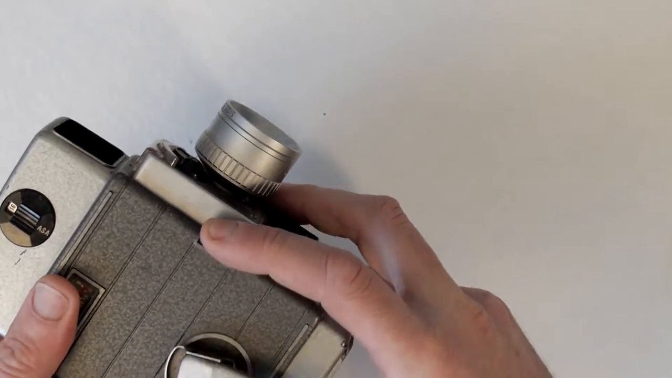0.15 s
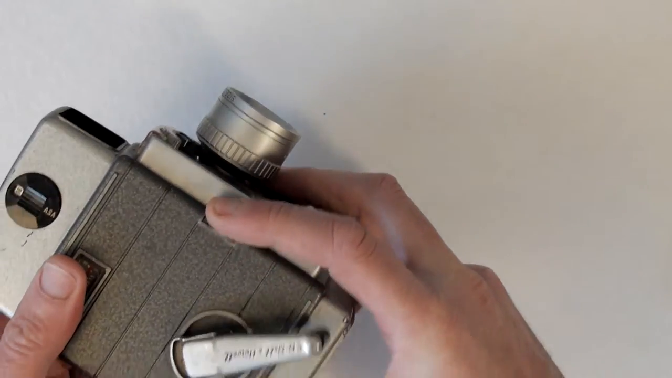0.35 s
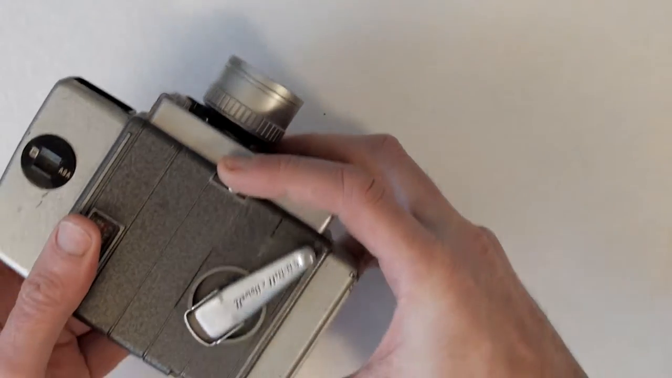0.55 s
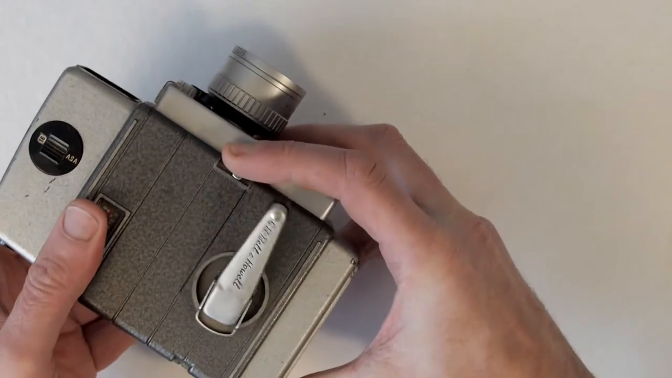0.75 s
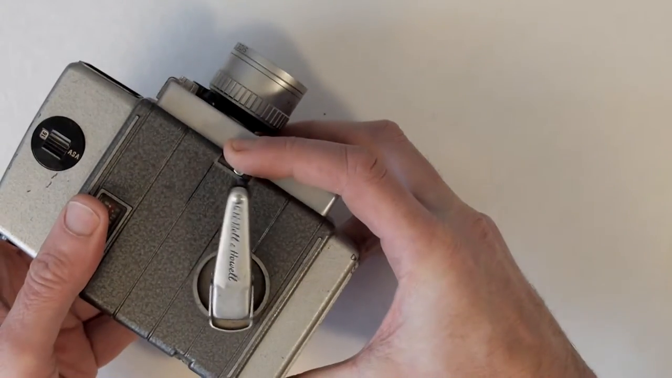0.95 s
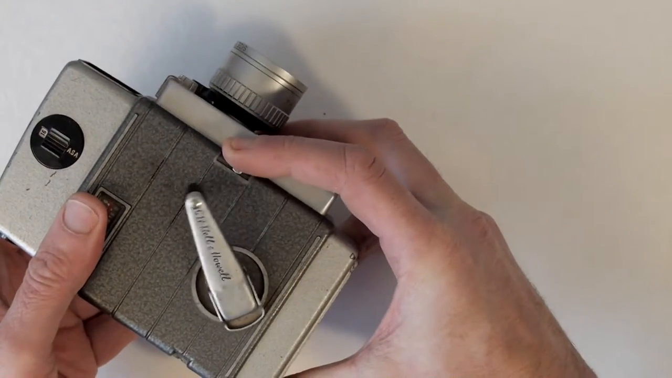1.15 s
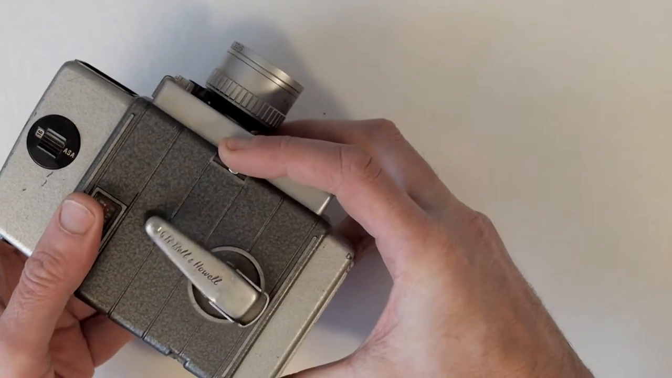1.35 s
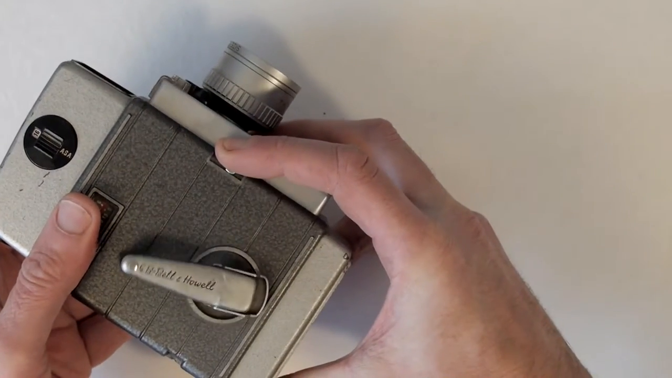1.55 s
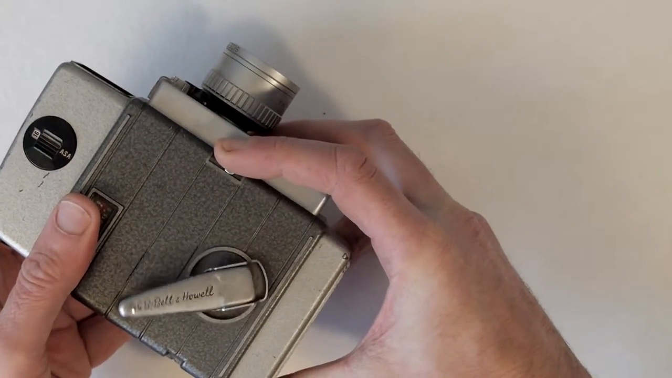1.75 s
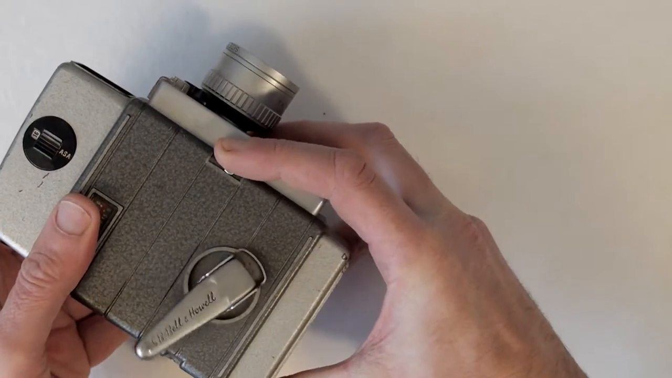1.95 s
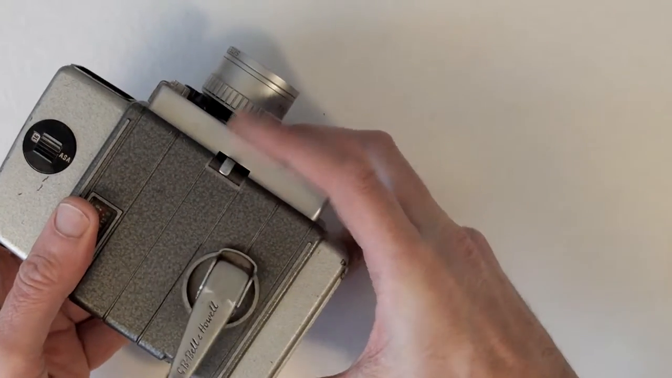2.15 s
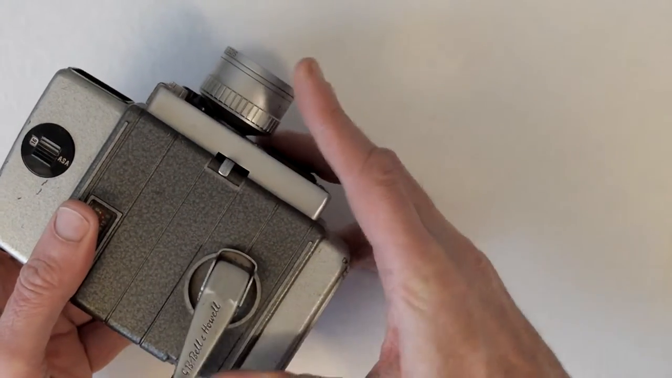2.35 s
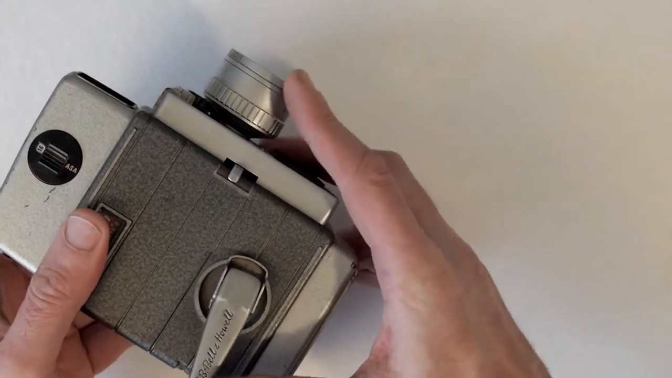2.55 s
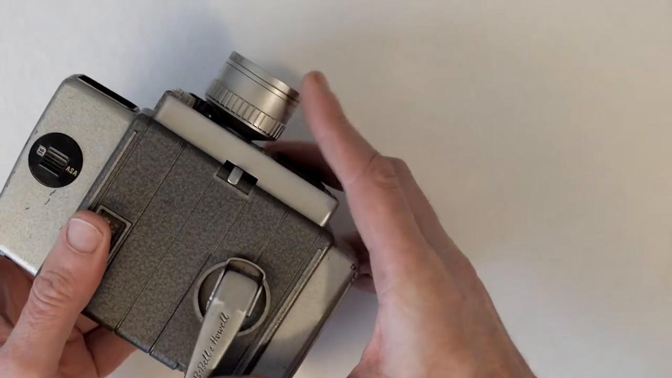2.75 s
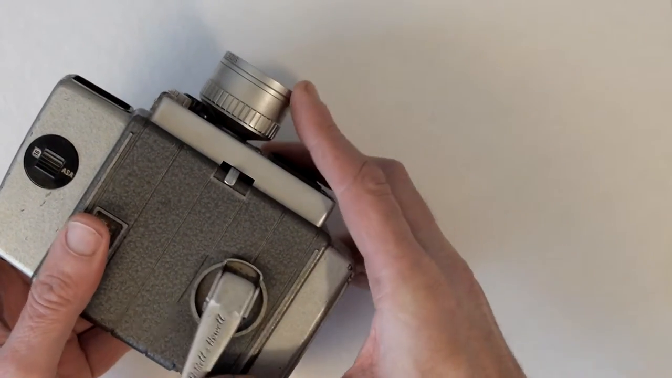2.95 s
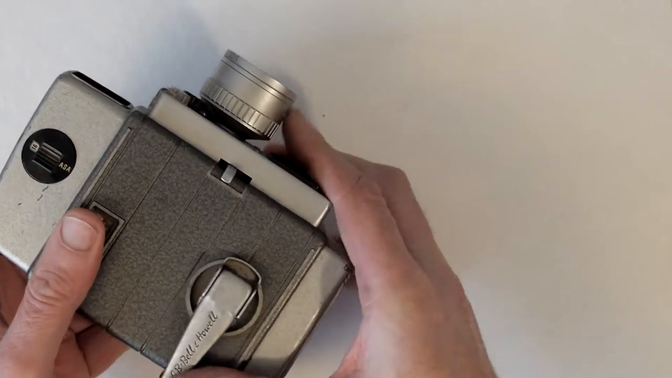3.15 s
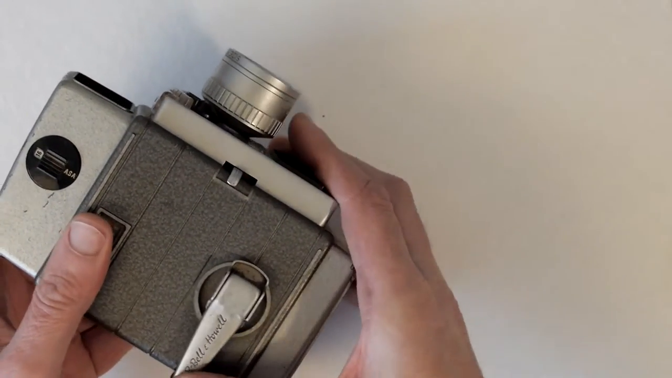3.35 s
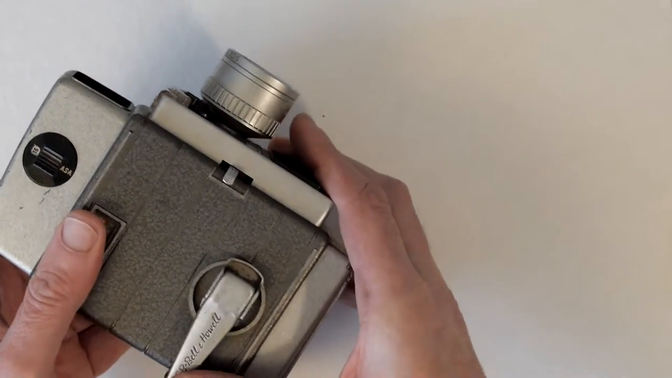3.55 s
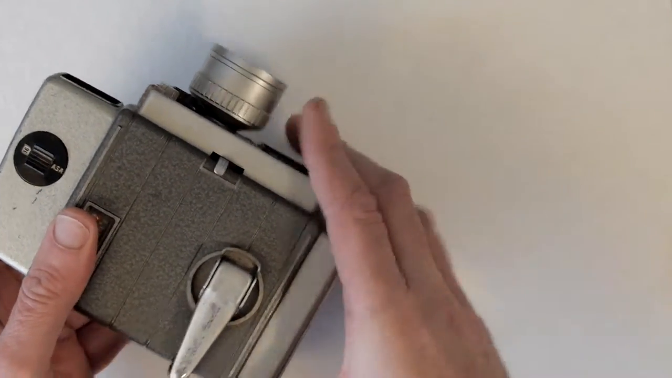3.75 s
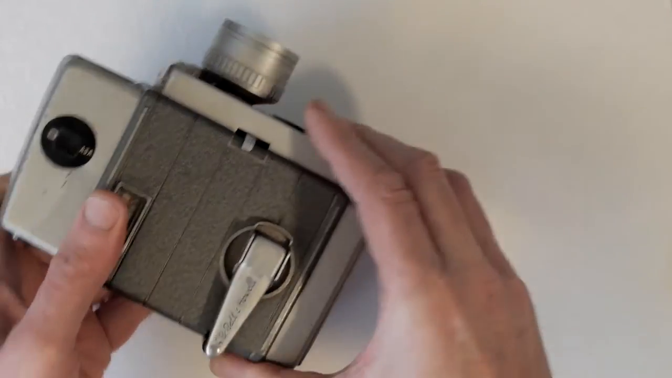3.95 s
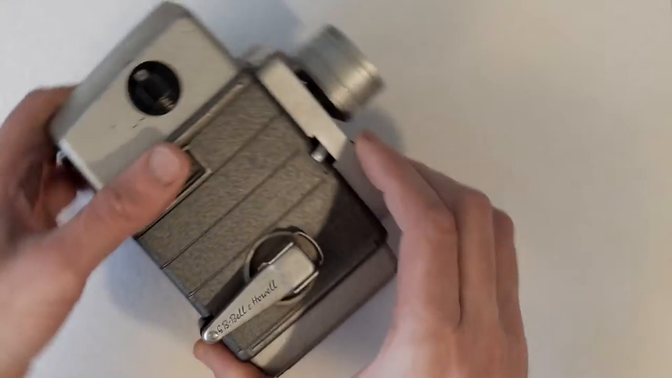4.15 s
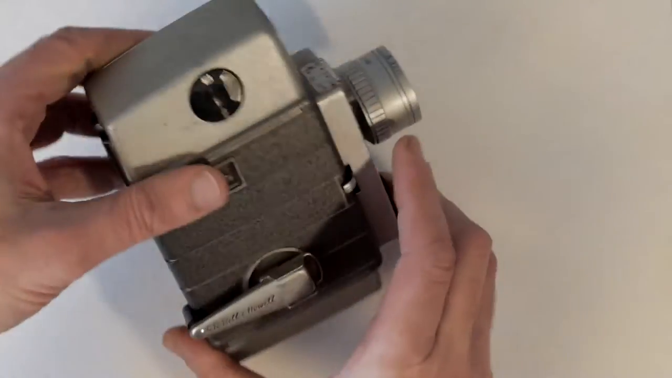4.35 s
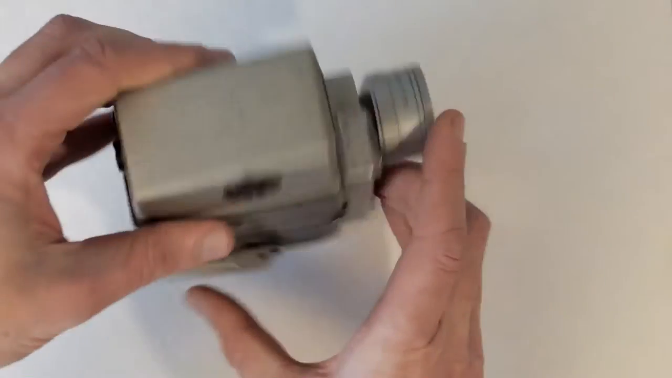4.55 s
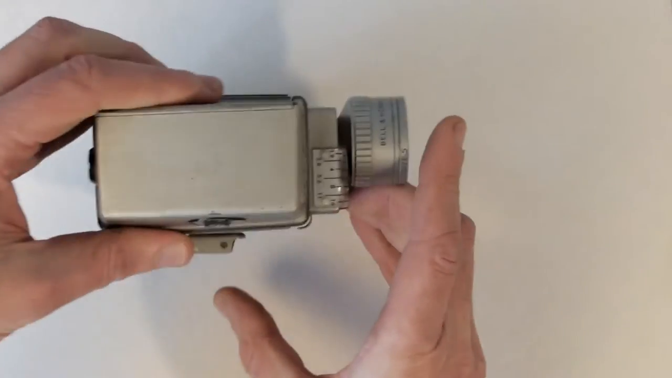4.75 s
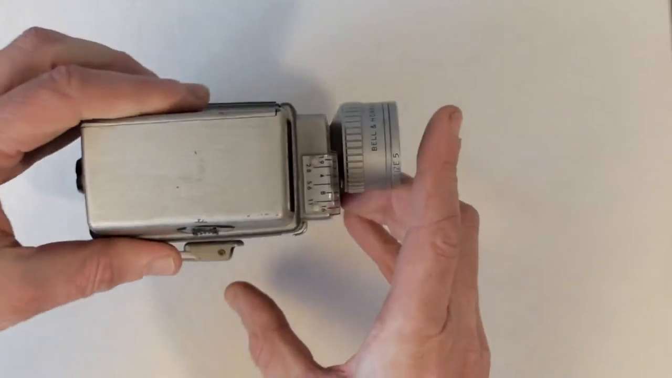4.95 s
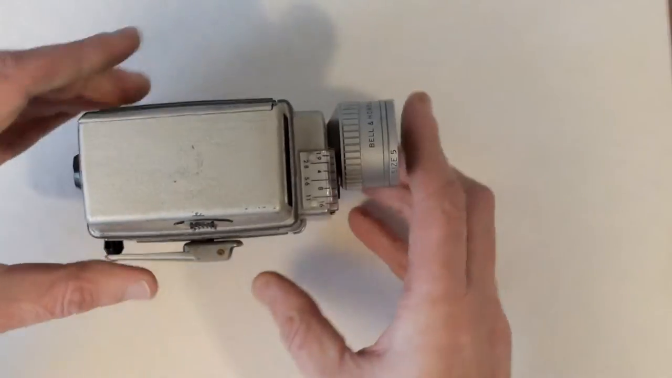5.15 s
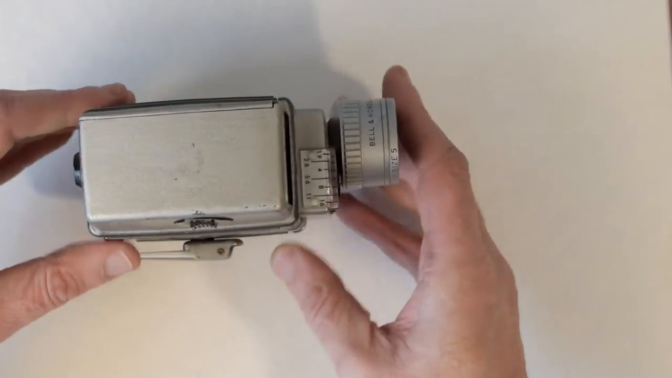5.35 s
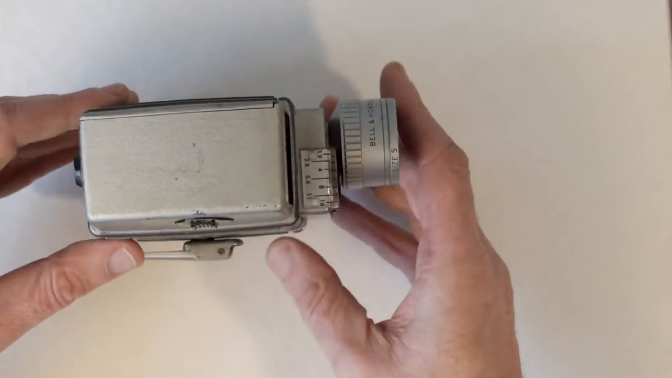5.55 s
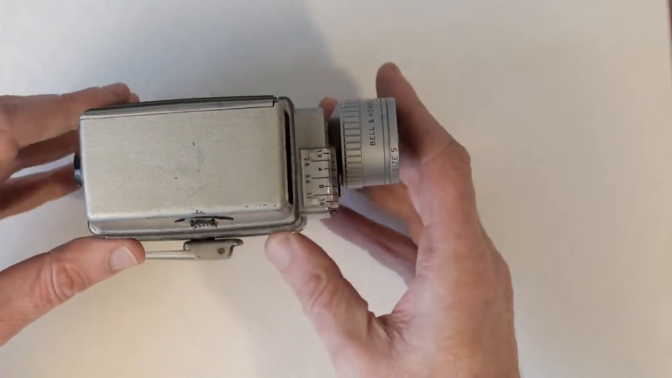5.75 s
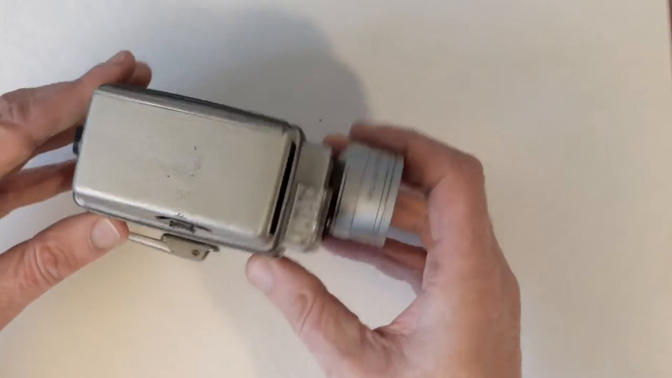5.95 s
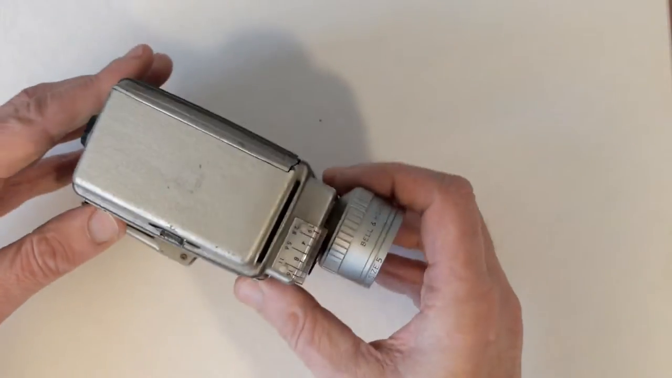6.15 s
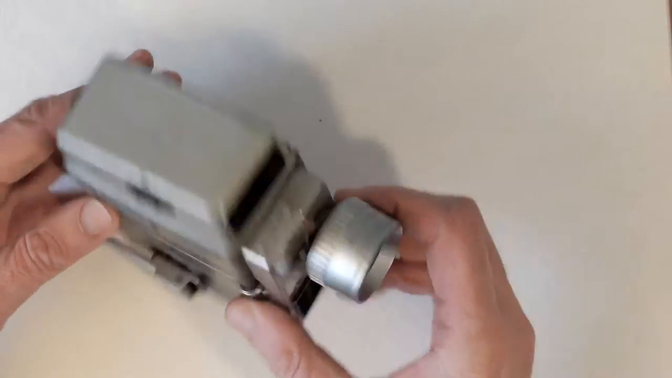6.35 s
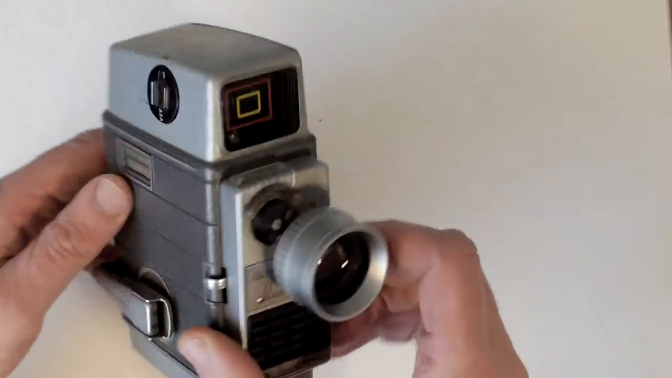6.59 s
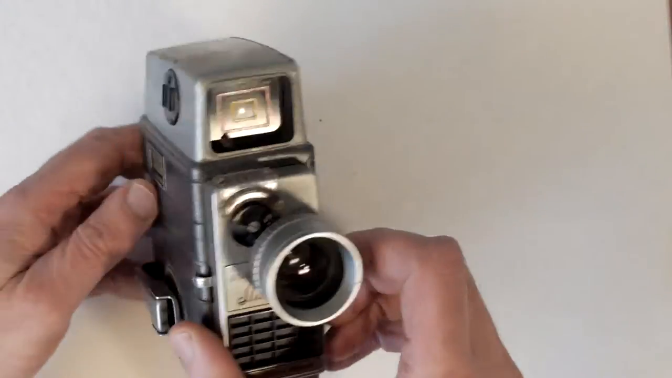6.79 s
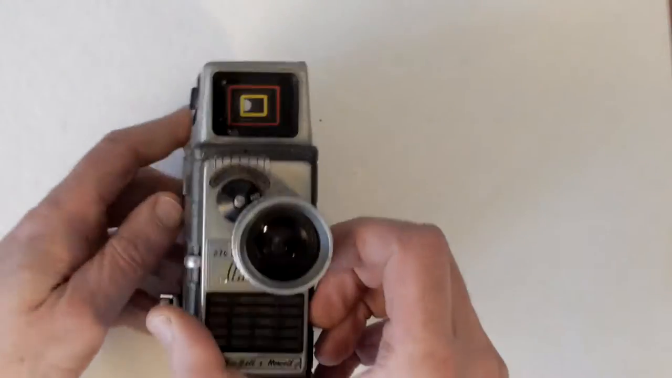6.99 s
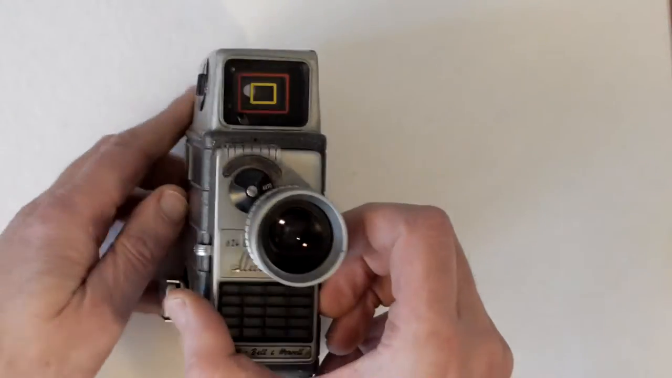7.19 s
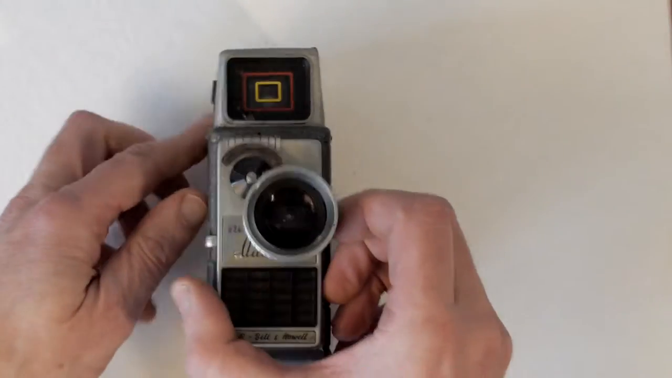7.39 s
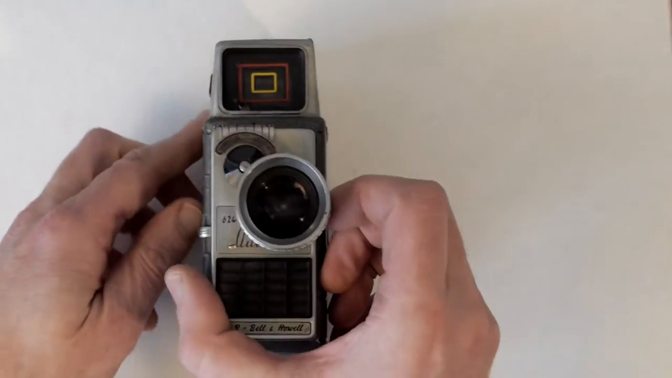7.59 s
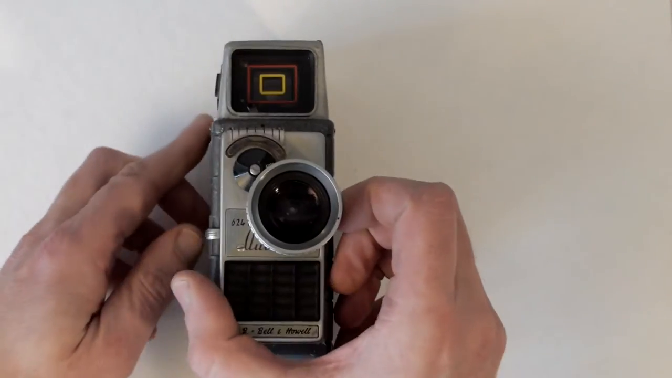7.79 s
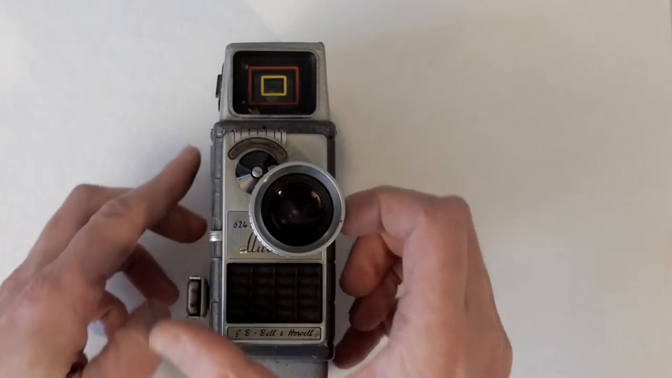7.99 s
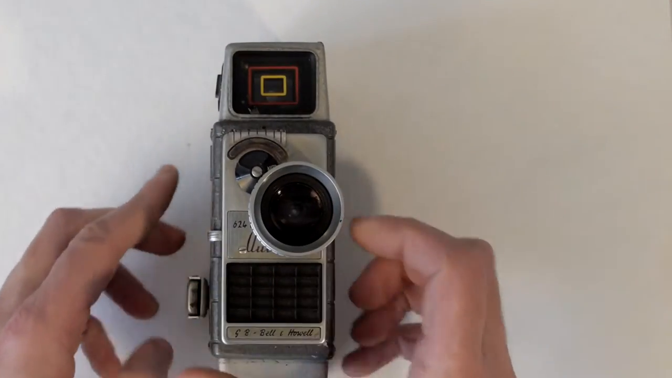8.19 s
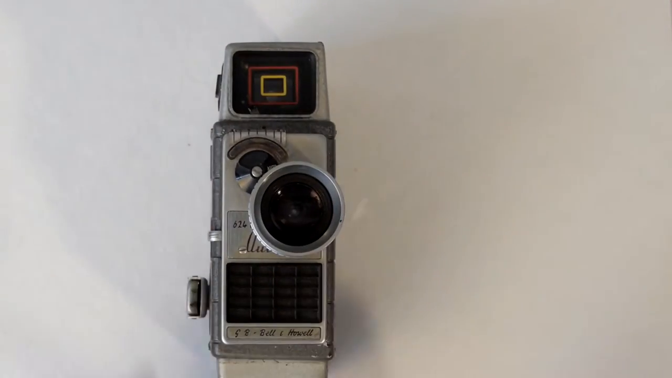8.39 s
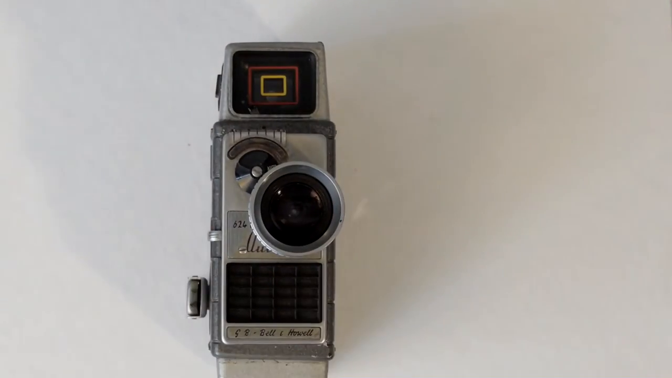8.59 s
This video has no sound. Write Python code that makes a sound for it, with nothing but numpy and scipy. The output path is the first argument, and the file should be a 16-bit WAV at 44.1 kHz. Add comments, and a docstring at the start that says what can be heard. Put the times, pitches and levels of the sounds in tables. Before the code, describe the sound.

Close up in a small quiet room, a spring-wound movie camera runs with a bright, gritty mechanical whirr, ticking about fifteen times a second. After two seconds its button snaps back and the motor stops dead. Hands then slide over metal and table with faint scuffs, scattered clicks and hollow bumps, building to firmer knocks and a hard click as the camera is set down near the end.

```python
"""A clockwork movie camera whirrs and rattles at about 15 frames a second, then its button snaps back and stops it.
After that come clicks, scuffs, sliding hands, knocks and a faint squeak, close by in a small room with faint room tone.
Gears and claw are noise shaped by trains of blows, some of it ringing the case; clicks are short bursts of metallic noise.
Knocks add fading tones of camera and table; rubbing is grainy noise; the room is an echo of fading noise."""
import sys
import numpy as np
from scipy import signal
from scipy.fft import rfft, irfft, next_fast_len
from scipy.io import wavfile
from scipy.ndimage import map_coordinates

SR = 44100
rng = np.random.default_rng(int(sys.argv[2]) if len(sys.argv) > 2 else 0)


def unload_audio(sound):
    """Save the sound as a 16-bit wav file, at the path given as the first command line argument."""
    columns = np.transpose(np.atleast_2d(sound))
    # keep every value between -1 and 1, then stretch to whole-number steps
    steps = np.round(np.clip(columns, -1, 1) * 32767)
    wavfile.write(sys.argv[1], SR, steps.astype(np.int16))


N = 380528
TIME = np.arange(N) / SR  # seconds from the start
AFTER = np.arange(SR // 2) / SR  # seconds after one touch

# In all tables fade_s is the time to fall by 60 dB; levels are relative, before the mix.
# Speed of the spring motor: time_s, speed_frames_per_s
MOTOR_SPEED = [(0, 14.6), (.4, 15.1), (.65, 15), (.9, 15.5), (1.3, 15.2), (1.75, 15.15), (2, 15.9),
               (2.27, 15.9)]
# Loudness of the motor: time_s, level_db
MOTOR_LEVEL = [(0, -29), (.35, -28), (.8, -27.5), (1.2, -28.5), (1.5, -27.5), (2.27, -28)]
STOP_S = 2.268
# Blows of claw and shutter in one frame: place_share_of_turn, force_db
CLAW_BLOWS = [(.76, -4), (0.86, -1), (0.94, 1.5), (0.028, -8), (0.39, 0)]
# Resonances of the case around the motor: pitch_hz, width_hz, level_db
CASE_MODES = [(355, 39, -18.5), (905, 100, -19), (1308, 54, -12.5), (1622, 41, -9), (2013, 130, -7),
              (2181, 80, 2.5), (2346, 98, -10), (3250, 50, -12), (3710, 87, -8.5), (5690, 280, -8.5)]
# One side panel sinks in pitch as the grip settles: time_s, pitch_hz
PANEL_PITCH = [(.35, 3570), (.85, 3480), (1.6, 3425)]
PANEL_WIDTH_HZ, PANEL_DB = 115, -3
# The ringing side of the case turns toward the microphone: time_s, level_db
CASE_FACING = [(0, -4), (.7, -1.5), (1.5, 1), (2.27, -0.5)]
# Colour of the gear noise: pitch_hz, level_db
GEAR_COLOUR = [(100, -42), (260, -16), (340, -5.5), (800, -0.5), (1800, -0.5), (2600, -3), (4500, 0.5),
               (8000, 2), (9300, 0), (10200, -3), (12200, -10), (13000, -9), (14000, -14), (16000, -20.5)]
# Four metallic bands drift as the camera turns in the hand:
# time_s, pitch_hz, pitch_hz, pitch_hz, pitch_hz, level_db (against the motor)
SHEEN_DRIFT = [(0, 7730, 7750, 9200, 11200, -11), (.3, 7620, 7780, 9100, 11250, -15),
               (.6, 7250, 7900, 8990, 11050, -12), (.95, 7180, 8000, 9130, 10930, -15.5),
               (1.35, 7080, 8300, 9230, 10850, -15), (2.27, 7500, 8450, 9560, 10820, -15)]
# The same four bands: width_hz, level_db
SHEEN_WIDTHS = [(450, -2), (450, -2), (480, -1.5), (600, -9)]
SHEEN_FLUTTER_DB = 2.5  # each band flutters on its own
# Spring modes that shiver on after the stop: pitch_hz, width_hz, level_db, fade_s
SPRING_SHIVER = [(620, 60, -55, .7), (2180, 120, -54, .25), (3670, 220, -53, .35), (5740, 250, -53, .33),
                 (7240, 250, -51, .38)]

# Coils of the unwinding spring slip while the motor runs: time_s, level_db
SPRING_SLIPS = [(0.059, -15), (0.866, -15), (1.255, -16), (1.391, -15), (1.457, -16), (1.978, -17),
                (2.173, -12)]
# The button unlatches, then springs home: time_s, snap_db, strongest_ring_hz, fade_s, spring_db
BUTTON_SNAPS = [(2.2255, -9.5, 12000, .014, -27.5), (2.266, -4, 8200, 0.034, -16.5)]
# Ringing tones of the button: pitch_hz, level_db, fade_s
BUTTON_MODES = [(3720, -7, .02), (5700, -5, .015), (7300, -5, .02), (8550, -7, .012), (9270, 0, .022),
                (10350, -5, .015)]
# Fingers and table snap the key and fittings: time_s, level_db, strongest_ring_hz, fade_s
FITTING_CLICKS = [(2.5766, -43, 2820, .025), (2.6522, -37.5, 5130, 0.022), (2.8892, -11.5, 6290, 0.0099),
                  (3.108, -38, 7050, 0.033), (3.175, -33.5, 7340, 0.0096), (3.196, -34, 4000, 0.022),
                  (4.061, -42, 7000, 0.018), (4.899, -36.5, 4900, 0.016), (5.1621, -27.5, 7170, 0.008),
                  (5.516, -40.5, 4450, 0.028), (5.9201, -17, 7080, 0.009), (6.38, -30, 6430, 0.014),
                  (7.0103, -22.5, 4950, 0.02), (7.0215, -28.5, 6000, 0.016), (7.466, -2, 3990, 0.013),
                  (7.476, -22, 3180, 0.015), (7.5958, -35.5, 3510, .02)]
# The winding key taps the case: time_s, ring_db, snap_db, rise_s
KEY_ON_CASE = [(4.7313, -44.5, -23, 0.00026), (5.0912, -41, -25.5, 0.0012), (5.3742, -49.5, -30, 0.0025),
               (7.4665, -29, -25, .001), (7.555, -41, -39, .002)]
# Ringing tones of the key: pitch_hz, level_db, fade_s
KEY_MODES = [(2190, -2.5, .03), (2460, -3.5, 0.02), (2790, 4.5, .02), (3120, -4.5, 0.028), (4190, -8, 0.02),
             (4400, -13, .022), (5970, -10.5, .013)]
# Fingernails and fittings tick on the hollow case: time_s, level_db
NAIL_TICKS = [(2.8895, -39.5), (3.064, -61.5), (3.1965, -53.5), (3.342, -62.5), (4.634, -50.5),
              (4.64, -48.5)]
# Colour of a metal snap: pitch_hz, level_db (per Hz)
METAL_COLOUR = [(200, -27), (1000, 0), (2200, 6), (2700, -2.5), (3700, -2.5), (5500, -0.5), (7500, -1.5),
                (9300, -1.5), (11000, 0), (16000, -7)]
CLICK_BODY_DB = -25.5  # the body's answer, against the snap

# Knocks on the camera: time_s, body_db, strongest_ring_hz, spread_octaves, table_db
CAMERA_KNOCKS = [(2.578, -52, 990, 0.62, -73), (2.8899, -39.5, 753, 1.2, -58),
                 (3.151, -55.5, 700, 0.74, -83), (3.275, -60, 700, 1, -83), (3.305, -63, 1050, .5, -83),
                 (4.057, -59, 420, 0.54, -75), (4.123, -58, 1100, 1.5, -78), (4.16, -57.5, 800, 1.4, -72),
                 (4.183, -56.5, 550, 0.94, -74), (4.198, -48, 650, 1.6, -70),
                 (4.223, -49, 337, 0.41, -50.5), (4.246, -50, 750, 1, -58), (4.748, -40, 520, 1.2, -33.5),
                 (4.757, -57, 430, 1.2, -39), (4.782, -62, 350, 0.79, -38), (4.806, -62, 338, .8, -42),
                 (4.85, -66, 338, .8, -48), (4.971, -76, 340, .8, -54), (5.012, -62, 846, .6, -70),
                 (5.0894, -48.5, 283, 0.41, -51), (5.1973, -52.5, 1100, 1, -54), (5.258, -57, 800, 1, -58),
                 (5.373, -50, 990, 1, -57), (5.921, -52, 900, 1.5, -70), (6.345, -37, 560, 0.93, -62.5),
                 (6.802, -40, 500, 1.3, -49), (6.977, -49, 1400, 0.3, -71), (7.0094, -23.5, 1000, 1.4, -55),
                 (7.021, -30, 400, .5, -51), (7.122, -42.5, 750, .9, -69), (7.1316, -29, 690, .4, -70),
                 (7.268, -38, 750, 1, -47.5), (7.316, -44.5, 1096, 0.88, -49),
                 (7.377, -51.5, 1094, .9, -54.5), (7.4614, -36, 400, 1.2, -28.5),
                 (7.4662, -26.5, 520, 1.6, -39), (7.4953, -37.5, 479, .9, -37),
                 (7.5551, -37, 850, .2, -43.5), (7.596, -50.5, 700, 0.35, -52)]
# Tones of the camera body when it rings freely: pitch_hz, level_db, fade_s
BODY_MODES = [(331.6, -3, 0.08), (420, -1.5, 0.075), (500, -2.5, 0.04), (606, -5, 0.19), (690, 0, 0.042),
              (845, -7, 0.055), (1018, 1.5, 0.034), (1130, 0, .015), (1340, -1, 0.04), (1751, -6.5, 0.115),
              (1900, -11, .06), (2310, -7.5, 0.06), (2800, -12, .04), (3275, -9, .11)]
# Tones of the table top when it rings freely: pitch_hz, level_db, fade_s
TABLE_MODES = [(38, -16, 0.25), (62.3, -11, 0.15), (82, -6, 0.15), (123, -4, 0.1), (166, 1, 0.18),
               (205, 1.5, 0.14), (238, -3.5, 0.2), (265, -3.5, 0.3), (344, -4, 0.2), (436, -8, .2),
               (571, -15, .2)]
FREE_DB, GRIP_DB = -18.5, 32  # a knock this hard rings freely; every GRIP_DB less halves the ring time
TOUCH_S, TOUCH_DB = 0.0089, -8  # the case grazes for a moment before each knock lands
CHATTER_DB, TABLE_SCATTER_DB = -11, 2
LIGHT_DB = 10.5  # a light touch loses up to this much of the table's deep boom

# Short slips of fingers and case: start_s, length_s, level_db, centre_hz
SHORT_SCUFFS = [(2.441, 0.029, -46, 5250), (2.783, 0.0265, -46.5, 4630), (2.951, 0.041, -53.5, 4416),
                (3.146, 0.034, -51, 5490), (3.253, 0.035, -57.5, 4160), (3.355, 0.022, -49, 5400),
                (3.762, 0.033, -42, 4300), (3.786, 0.032, -36, 4400), (4.629, .024, -35.5, 13900),
                (4.731, 0.037, -47.5, 3500), (7.003, 0.029, -41.5, 5396), (7.159, 0.05, -43.5, 6080),
                (7.253, 0.046, -38, 6560), (7.305, 0.052, -42.5, 6450), (7.389, 0.11, -45.5, 6090),
                (7.447, 0.034, -35.5, 2990)]
# Colour of the scuffs: pitch_hz, level_db (per Hz)
SCUFF_COLOUR = [(200, -25), (650, -6), (1200, -15.5), (2100, 0.5), (2500, -1), (3400, -1), (4300, -8),
                (5600, -5), (9000, -6.5), (13000, -4.5), (16000, -9.5)]
SCUFF_ATTACK_S, SCUFF_RELEASE_S, SCUFF_ARCH_DB = 0.0062, 0.012, 3.5
# A fingertip drags on metal: time_s, pitch_hz, level_db
FINGER_SQUEAK = [(6.79, 7000, -76.5), (6.81, 7006, -64), (6.86, 6144, -85.5), (6.96, 6020, -72),
                 (7, 5820, -89.5)]

# Strokes of the hands over table and case: start_s, length_s, hiss_db, body_db
HAND_STROKES = [(3.03, 0.5, -65, -69.5), (3.655, 0.41, -58.5, -61), (4.005, 0.24, -60, -61),
                (4.165, 0.3, -46, -56), (4.398, 0.34, -48, -55.5), (4.743, 0.24, -52, -57),
                (4.906, 0.29, -63, -66), (5.077, 0.44, -51.5, -60.5), (5.429, 0.19, -65, -73),
                (5.859, 0.39, -49, -56.5), (6.241, 0.35, -53.5, -59.5), (6.499, 0.54, -60.5, -59.5),
                (7.222, 0.37, -50, -47.5), (7.518, 0.37, -61, -57.5)]
STROKE_ATTACK_S, STROKE_RELEASE_S, STROKE_ARCH_DB = 0.018, 0.14, 6.5  # loudest in mid stroke
HOLD_HISS_DB, HOLD_BODY_DB = -75.5, -67.5  # the hands never rest completely
BUMPS_PER_S, BUMP_DB = 11, -11  # average rate of small bumps; level against the stroke's body
# Colour of the skin hiss: pitch_hz, level_db (per Hz)
SKIN_COLOUR = [(600, -33), (1000, -10), (1700, -5.5), (2150, 0.5), (2450, -2.5), (2850, -1), (3200, -3),
               (3550, -2), (4300, -3), (6500, -5), (9000, -7), (13000, -13.5), (16000, -22)]
# Colour of the hollow sound under the hands: pitch_hz, level_db (per Hz)
HOLLOW_COLOUR = [(88, -41), (150, -14), (242, -7.5), (345, 1), (530, -8), (720, -2.5), (900, -9),
                 (1520, -9), (1800, -11.5), (2340, -34.5), (3960, -120)]
# Bands of the case that rubbing makes sing: pitch_hz, width_hz, level_db (against the hiss)
SINGING_BANDS = [(1500, 250, -19), (2050, 200, -20), (2850, 220, -11), (3540, 190, -12)]
RUB_GRAIN_DB, RUB_SWELL_DB = 2.8, 1.3  # quick fits of singing; slower swells of finger pressure

# How fast the echo dies: pitch_hz, fade_s
ROOM_FADE = [(150, 0.57), (600, 0.33), (3000, 0.3), (8000, 0.21), (15000, 0.24)]
# Colour of the echo: pitch_hz, level_db
WALL_COLOUR = [(60, -3.5), (250, 6), (600, 3.5), (1200, 1.5), (4000, -0.5), (8000, -8), (16000, -8)]
# Colour of the room tone: pitch_hz, level_db (per Hz)
QUIET_COLOUR = [(15, -38.5), (25, -7.5), (166, -4), (249, -4.5), (270, -19), (317, -8), (363, -19),
                (575, -11), (734, -8.5), (840, -8.5), (2000, -21), (2410, -21), (16000, -28)]
END_S, TOP_HZ = 7.745, 15900


def motor(teeth_per_frame=44):
    """Gear teeth rattle, harder while the claw pulls; both ring the case until the stop."""
    turns = np.cumsum(curves(MOTOR_SPEED)[0]) / SR - .23
    frames = np.arange(-1, int(turns[-1]) + 1)
    teeth = np.arange(len(frames) * teeth_per_frame) / teeth_per_frame
    load_db = 2.8 * np.cos(2 * np.pi * teeth)

    place, force_db = np.transpose(CLAW_BLOWS)
    claw_places = (frames[:, None] + place).ravel()
    claw_db = np.tile(force_db, len(frames))
    claw = unit(blows(turns, claw_places, claw_db, jitter_s=.001, scatter_db=1.84, t60=0.045))

    def wheel(step, jitter_s, scatter_db, t60):
        """One gear wheel: a blow for every step-th tooth."""
        return unit(blows(turns, teeth[::step], load_db[::step], jitter_s, scatter_db, t60))

    # the wheels chatter independently: in the open they buzz, against the case they tick
    fine = wheel(step=1, jitter_s=.0003, scatter_db=1.6, t60=.009)
    coarse = wheel(step=3, jitter_s=.001, scatter_db=2.4, t60=.007)
    gears = np.hypot(fine, amp(-6.5) * coarse)
    rattle = unit(np.hypot(gears, amp(-0.5) * claw))
    shake = unit(np.hypot(coarse, amp(-3.5) * claw) ** 0.85)

    def even(hz):
        """Share of the power in the steady low whirr."""
        return 1 / (1 + (hz / 1400) ** 4)

    # the low whirr of the spinning governor is even; only the treble follows the blows
    spin = filtered(rng.standard_normal(N), lambda hz: np.sqrt(even(hz)))
    clatter = filtered(rattle * rng.standard_normal(N), lambda hz: np.sqrt(1 - even(hz)))
    case_ring = unit(held_case(shake * rng.standard_normal(N)))
    ringing = amp(curves(CASE_FACING)[0] - 3.0) * case_ring
    whirr = amp(-4.5) * coloured(spin + clatter, GEAR_COLOUR) + ringing
    running = amp(curves(MOTOR_LEVEL)[0]) * (TIME < STOP_S)
    return running * (whirr + metallic_sheen(claw))


def metallic_sheen(claw):
    """Four thin drifting bands of noise flutter separately and swell with the claw."""
    *centres, sheen_db = curves(SHEEN_DRIFT)
    bands = np.zeros(N)
    for hz, (width_hz, db) in zip(centres, SHEEN_WIDTHS):
        flutter = unit(amp(SHEEN_FLUTTER_DB * wobble(20)))
        bands += amp(db) * flutter * whistle(hz, width_hz)
    return amp(sheen_db) * unit(np.hypot(claw, .7)) * bands


def blows(turns, places, sizes_db, jitter_s, scatter_db, t60):
    """Loudness curve of blows at given places of the shaft, each a little off in time and force."""
    late, size = rng.standard_normal((len(places), 2)).T
    at = ((np.interp(places, turns, TIME) + jitter_s * late) * SR).astype(int)
    inside = (places > turns[0]) & (at >= 0) & (at < N)
    force = amp(sizes_db + scatter_db * size)
    power = np.bincount(at[inside], force[inside] ** 2, N)
    fade = amp(-60 * AFTER / t60)
    return np.sqrt(np.abs(signal.fftconvolve(power, fade ** 2)[:N]))


def case(hz, panel_hz):
    """Resonances of the hollow metal case add up, with the side panel tuned to panel_hz."""
    modes = list(CASE_MODES) + [(panel_hz, PANEL_WIDTH_HZ, PANEL_DB)]
    modes = sorted(modes, key=lambda mode: mode[0])
    response = 0
    for k, (centre, width, db) in enumerate(modes):
        damping = 1j * hz * width
        resonance = damping / (centre * centre - hz * hz + damping)
        response = response + amp(db) * resonance * (-1) ** k  # neighbours have opposite signs
    return response


def held_case(drive):
    """The shaken case fades from one tuning of its panel to the next."""
    times, tunings = np.transpose(PANEL_PITCH)
    out = np.zeros(N)
    for share, panel_hz in zip(np.eye(len(times)), tunings):
        tuned = filtered(drive, lambda hz: case(hz, panel_hz))
        out += np.interp(TIME, times, share) * tuned
    return out


def shiver():
    """Jolted spring modes, each a narrow band of noise, shiver and fade after the stop."""
    since = np.maximum(TIME - STOP_S, 0)
    out = np.zeros(N)
    for hz, width_hz, db, t60 in SPRING_SHIVER:
        out += amp(db - 60 * since / t60) * whistle(np.full(N, hz), width_hz)
    return (TIME > STOP_S) * out


def clicks():
    """The spring slips, the button springs back and rings, and key and fittings snap when handled."""
    out = np.zeros(N)
    for s, db in SPRING_SLIPS:
        add(out, s, amp(db) * snap(ring_hz=4500, rise_s=.0004, t60=0.014))
        add(out, s, amp(db - 20.5) * case_tick())
    for s, db, ring_hz, t60, spring_db in BUTTON_SNAPS:
        spring = ring(BUTTON_MODES, centre_hz=7960, octaves=0.81, depth_db=4.0, scatter_db=2.5)
        add(out, s, amp(db) * snap(ring_hz, rise_s=0.00086, t60=t60))
        add(out, s + 0.0011, amp(spring_db) * spring)
    for s, db, ring_hz, t60 in FITTING_CLICKS:
        add(out, s, amp(db) * snap(ring_hz, rise_s=0.00061, t60=t60))
    for s, ring_db, snap_db, rise_s in KEY_ON_CASE:
        key = ring(KEY_MODES, centre_hz=2900, octaves=0.98, depth_db=8.5, scatter_db=4.5)
        add(out, s, amp(ring_db) * key * np.minimum(AFTER / rise_s, 1))
        add(out, s, amp(snap_db) * snap(ring_hz=3210, rise_s=rise_s, t60=.01))
    for s, db in NAIL_TICKS:
        add(out, s, amp(db) * case_tick())
    return out


def snap(ring_hz, rise_s, t60):
    """One metal contact: a dense fading ring of noise over a short answer of the body."""
    fade = amp(-60 * np.maximum(AFTER - rise_s, 0) / t60) * np.minimum(AFTER / rise_s, 1)
    grain = noise(METAL_COLOUR, size=len(AFTER))
    metal = filtered(grain, lambda hz: hump(hz, ring_hz, octaves=0.93, depth_db=10.5))
    body = ring(BODY_MODES, centre_hz=1100, octaves=1.0, depth_db=14, scatter_db=2.5, length=0.6)
    return amp(-6.5) * (fade * unit(metal) + amp(CLICK_BODY_DB) * body)


def case_tick():
    """A very short burst of noise rings the case; average level 1 over the first 20 ms."""
    burst = rng.standard_normal(len(AFTER)) * amp(-60 * AFTER / .001)
    x = filtered(burst, lambda hz: case(hz, PANEL_PITCH[0][1]))
    return x / np.sqrt(np.mean(x[:SR // 50] ** 2))


def knocks():
    """The camera grazes, its body rings briefly, loose parts chatter and the table top booms."""
    out = np.zeros(N)
    for s, body_db, ring_hz, octaves, table_db in CAMERA_KNOCKS:
        # the grip shortens the ringing of softer knocks
        length = 2 ** min((max(body_db, table_db) - FREE_DB) / GRIP_DB, 0)
        body = ring(BODY_MODES, ring_hz, octaves, depth_db=26.5, scatter_db=3.0, length=length)
        grain = rng.standard_normal(len(AFTER))
        chatter = unit(filtered(grain, lambda hz: hump(hz, ring_hz, octaves=2.2, depth_db=43.5)))
        fade = amp(-60 * AFTER / (0.04 * length)) * (1 - np.exp(-AFTER / .001))
        knock = body + amp(CHATTER_DB) * fade * chatter
        graze = np.interp(AFTER, [0, TOUCH_S, 2 * TOUCH_S], [0, 1, 0]) * chatter[::-1]
        table = ring(TABLE_MODES, centre_hz=250, octaves=1.0, depth_db=4 - LIGHT_DB * length,
                     scatter_db=TABLE_SCATTER_DB, length=length)
        add(out, s - TOUCH_S, amp(body_db + TOUCH_DB) * graze)
        add(out, s, amp(body_db) * knock)
        add(out, s, amp(table_db) * table)
    return out


def scuffs():
    """Brief grainy slips that swell and let go."""
    out = np.zeros(N)
    for start, length, db, centre_hz in SHORT_SCUFFS:
        grain = noise(SCUFF_COLOUR, size=len(AFTER))
        slip = filtered(grain, lambda hz: hump(hz, centre_hz, octaves=0.55, depth_db=9.0))
        shape = swell(AFTER, length, SCUFF_ATTACK_S, SCUFF_RELEASE_S, SCUFF_ARCH_DB)
        add(out, start, amp(db) * shape * unit(slip))
    return out * unit(amp(2.1 * wobble(700)))


def squeak():
    """A fingertip drags over the metal with a faint falling whistle."""
    hz, db = curves(FINGER_SQUEAK)
    touching = (TIME > FINGER_SQUEAK[0][0]) * (TIME < FINGER_SQUEAK[-1][0])
    return amp(db) * whistle(hz, width_hz=180) * touching


def bumps():
    """Sliding fingers jostle the case: tiny chance knocks during each stroke."""
    out = np.zeros(N)
    for start, length, _, body_db in HAND_STROKES:
        delays = np.cumsum(rng.gamma(2, .5, 8)) / BUMPS_PER_S
        for delay, size in zip(delays, rng.standard_normal(8)):
            tap = ring(BODY_MODES, centre_hz=898, octaves=1.0, depth_db=11.5, scatter_db=5.0, length=.4)
            add(out, start + delay, (delay < length) * amp(body_db + BUMP_DB + 2 * size) * tap)
    return out


def hands():
    """Skin slides over table and case, catching in tiny ticks and making the case sing in short fits."""
    hiss, body = np.zeros((2, N))
    for start, length, hiss_db, body_db in HAND_STROKES:
        stroke = swell(TIME[:SR], length, STROKE_ATTACK_S, STROKE_RELEASE_S, STROKE_ARCH_DB)
        add(hiss, start, amp(hiss_db) * stroke)
        add(body, start, amp(body_db) * stroke)
    snags = (rng.random(N) < 45 / SR) * rng.exponential(1, N)  # about 45 a second
    ticks = signal.fftconvolve(snags, amp(-60 * AFTER / 0.012))[:N]
    pressure_db = 1.6 * wobble(400) + 1.1 * wobble(35) + RUB_SWELL_DB * wobble(11)
    catch = unit(amp(pressure_db) + .8 * ticks)
    singing = np.zeros(N)
    for hz, width_hz, db in SINGING_BANDS:
        fits = unit(amp(RUB_GRAIN_DB * wobble(60)))
        singing += amp(db) * fits * whistle(np.full(N, hz), width_hz)
    hiss = np.hypot(hiss, amp(HOLD_HISS_DB))
    body = np.hypot(body, amp(HOLD_BODY_DB))
    skin = amp(-0.44) * noise(SKIN_COLOUR) + singing
    return catch * (hiss * skin + body * noise(HOLLOW_COLOUR))


def room(x, count=6):
    """A diffuse echo whose treble dies first; successive half-milliseconds take different paths."""
    hz, t, z = signal.stft(rng.standard_normal((count, SR * 3 // 4)), SR, nperseg=256)
    fade = amp(-60 * t / along(ROOM_FADE, hz)[:, None])
    tails = signal.istft(z * fade, SR, nperseg=256)[1]
    tails = tails * (1 - np.exp(-np.arange(tails.shape[1]) / SR / 0.00043))  # soft onset
    low = filtered(x, lambda hz: 1 / (1 + (hz / 2500) ** 6))  # the lows share one path
    path = np.arange(N) // (SR // 2000) % count
    pieces = (x - low) * (path == np.arange(count)[:, None])
    treble = signal.fftconvolve(pieces, tails, axes=1).sum(0)[:N]
    treble = filtered(treble, lambda hz: hz > 1800)
    return (signal.fftconvolve(low, tails[0])[:N] + treble) / np.linalg.norm(tails[0])


def room_tone():
    """Faint steady noise of the quiet room."""
    return amp(-62.5) * noise(QUIET_COLOUR)


def ring(modes, centre_hz, octaves, depth_db, scatter_db, length=1):
    """Struck tones, average level 1 over the first 20 ms; the contact favours those near the centre."""
    hz, db, t60 = np.transpose(modes)[:, :, None]
    size, detune, phase = rng.standard_normal((3, len(modes), 1))
    gain = amp(db + scatter_db * size) * hump(hz, centre_hz, octaves, depth_db)
    pitch = hz * (1 + .004 * detune)
    start = np.pi * np.arange(len(modes))[:, None] + .5 * phase
    fade = amp(-60 * AFTER / (t60 * length))
    x = np.sum(gain * fade * np.sin(2 * np.pi * pitch * AFTER + start), 0)
    x = x * (1 - np.exp(-2 * np.pi * AFTER * centre_hz)) ** 2  # soft onset
    # little radiates below the lowest tone
    x = signal.lfilter(*signal.butter(2, hz.min() / 2, "high", fs=SR), x)
    return x / np.sqrt(np.mean(x[:SR // 50] ** 2))


def hump(hz, centre_hz, octaves, depth_db):
    """Gain that favours pitches near a centre; far ones change by -depth_db."""
    distance = np.log2((hz + 1) / centre_hz) / octaves
    return amp(depth_db * (np.exp(-.5 * distance ** 2) - 1))


def swell(t, length, attack_s, release_s, arch_db):
    """Loudness curve of a rub: it takes hold, is loudest halfway and lets go."""
    held = np.clip(t / attack_s, 0, 1) * np.clip((length - t) / release_s, 0, 1)
    return held * amp(-arch_db * np.clip(2 * t / length - 1, -1, 1) ** 2)


def whistle(centre_hz, width_hz):
    """Narrow noise of average level 1 around a moving pitch."""
    turn = 2 * np.pi * np.cumsum(centre_hz) / SR
    return unit(wobble(width_hz) * np.cos(turn) + wobble(width_hz) * np.sin(turn))


def wobble(rate):
    """A smooth random curve through rate random points a second."""
    return map_coordinates(rng.standard_normal(int(N * rate / SR) + 4), [TIME * rate])


def noise(spectrum, size=N):
    """Fresh noise of the given colour."""
    return coloured(rng.standard_normal(size), spectrum)


def coloured(x, spectrum):
    """Shape x by pitch and level points, at average level 1."""
    return unit(filtered(x, lambda hz: amp(along(spectrum, hz))))


def filtered(x, response):
    """Change the gain of x at each pitch, as the response says."""
    m = next_fast_len(len(x) + 8192)
    return irfft(rfft(x, m) * response(np.fft.rfftfreq(m, 1 / SR)), m)[:len(x)]


def along(points, hz):
    """Read values between pitch points, on a logarithmic pitch scale."""
    f, v = np.transpose(points)
    return np.interp(np.log(hz + 1), np.log(f + 1), v)


def curves(rows):
    """One value per sample for each column after the time."""
    s, *cols = np.transpose(rows)
    return [np.interp(TIME, s, c) for c in cols]


def amp(db):
    """Decibels to gain."""
    return 10 ** (np.asarray(db) / 20)


def unit(x):
    """Scale to average (rms) level 1."""
    return x / np.sqrt(np.mean(x ** 2) + 1e-20)


def add(track, s, x):
    """Mix x into the track at time s."""
    i = max(round(s * SR), 0)
    track[i:i + len(x)] += x[:max(N - i, 0)]


def scene():
    """Camera and hands close by, with an echo of the camera and faint room tone."""
    camera = motor() + clicks() + knocks() + scuffs() + squeak() + bumps() + shiver()
    echo = filtered(room(camera), lambda hz: amp(along(WALL_COLOUR, hz)))
    return (camera + amp(-14.0) * echo + hands() + room_tone())[None]


def record(dry):
    """The recorder clips at full scale, fades out in 10 ms at the end and cuts off the highest treble."""
    on = np.clip((END_S - TIME) / .01, 0, 1)
    clipped = np.clip(dry[0], -1, 1) * on
    return filtered(clipped, lambda hz: 1 / np.sqrt(1 + (hz / TOP_HZ) ** 160))[None]


dry = scene()
out = record(dry)
unload_audio(out)
```